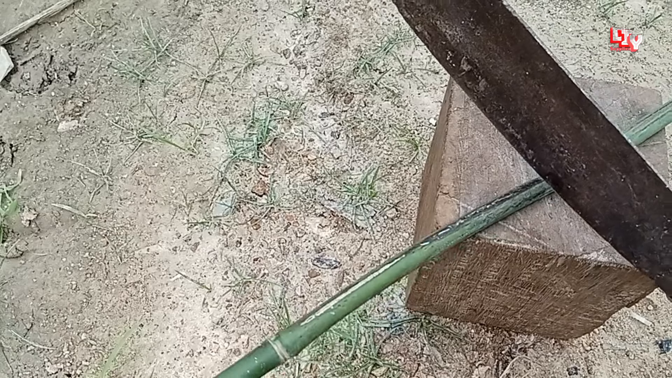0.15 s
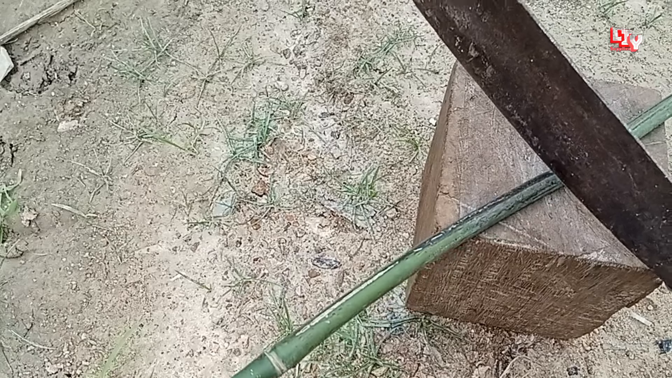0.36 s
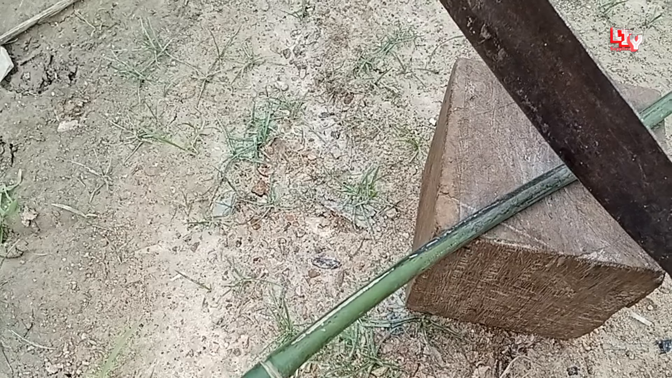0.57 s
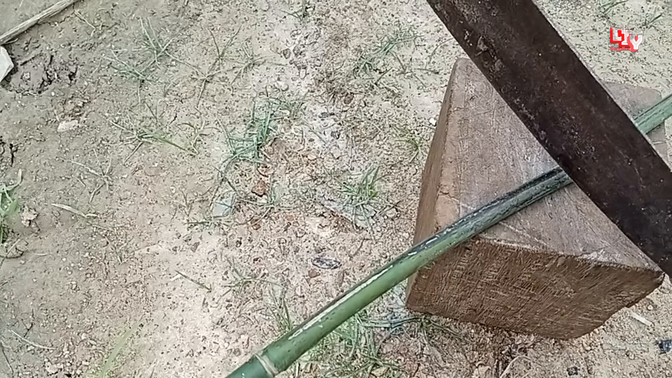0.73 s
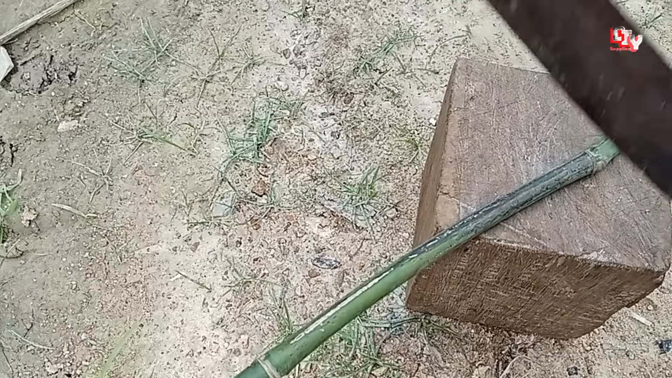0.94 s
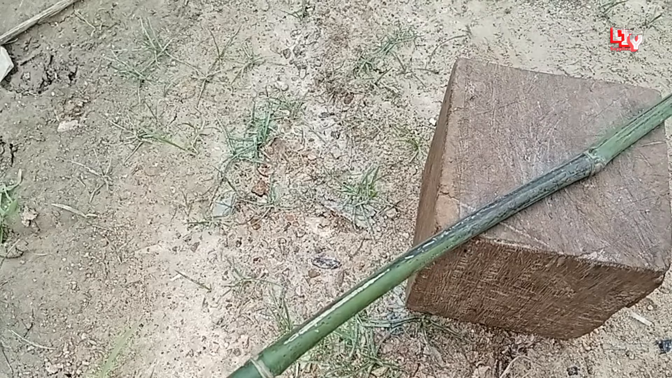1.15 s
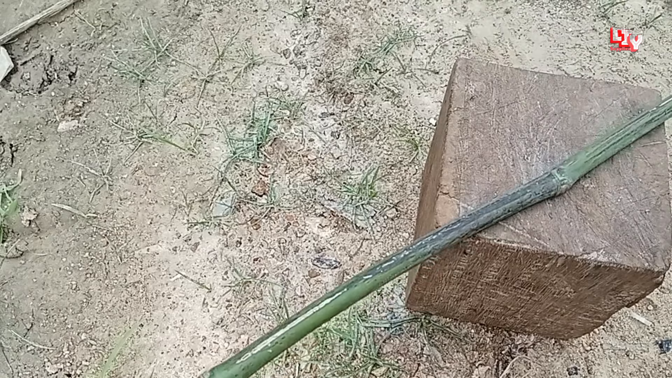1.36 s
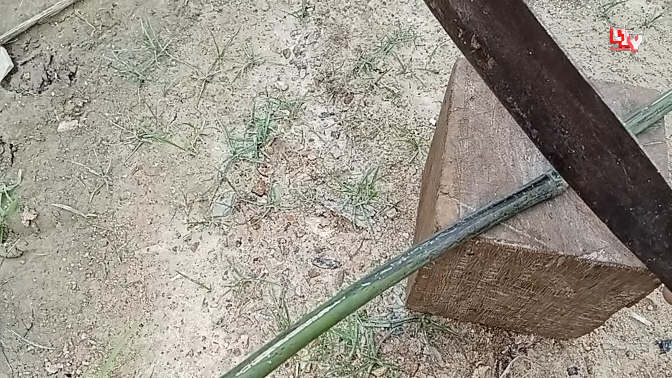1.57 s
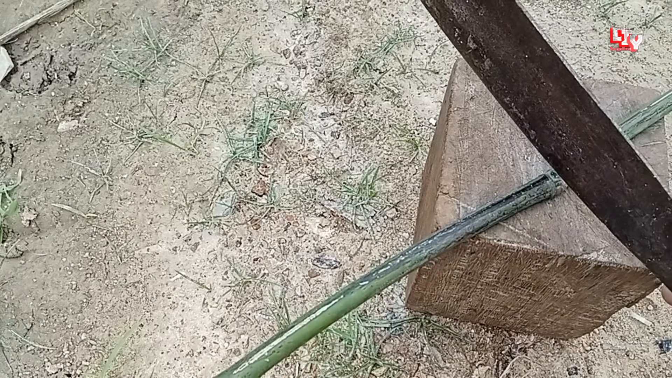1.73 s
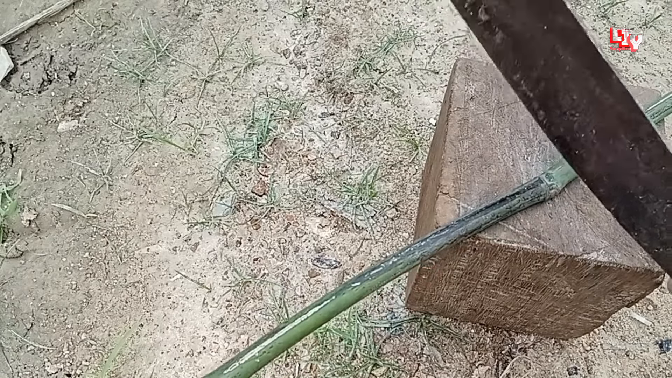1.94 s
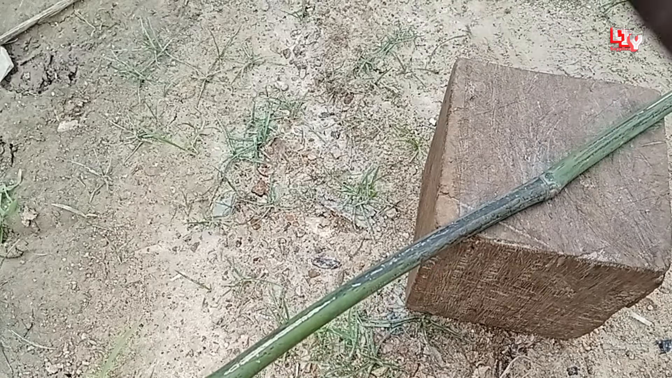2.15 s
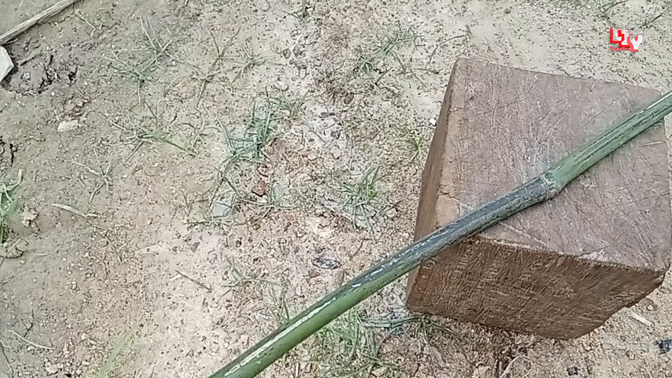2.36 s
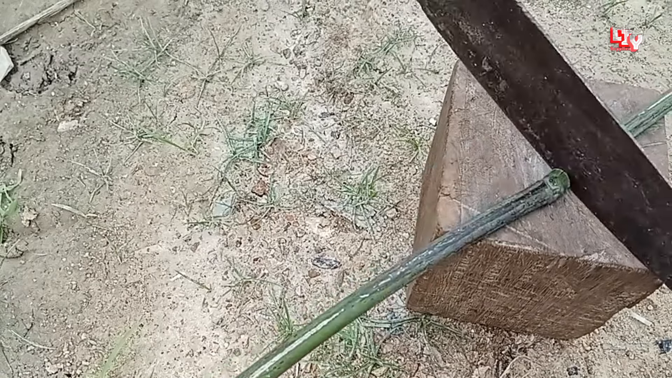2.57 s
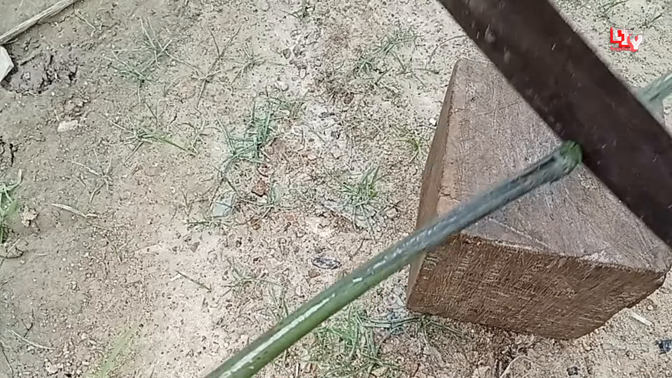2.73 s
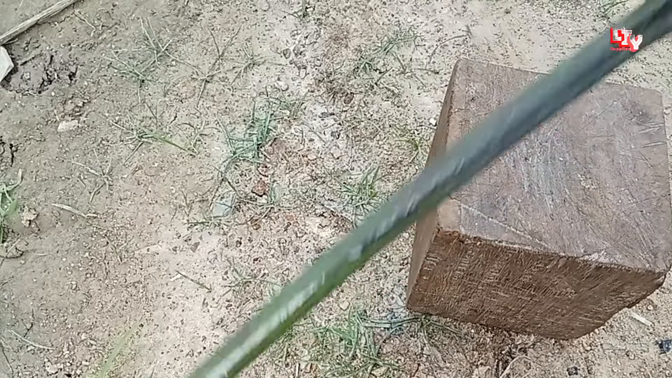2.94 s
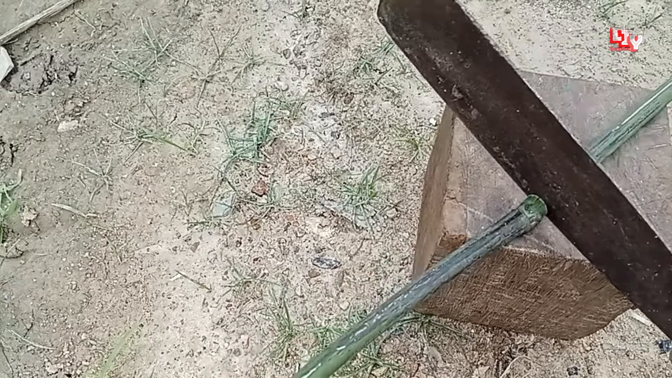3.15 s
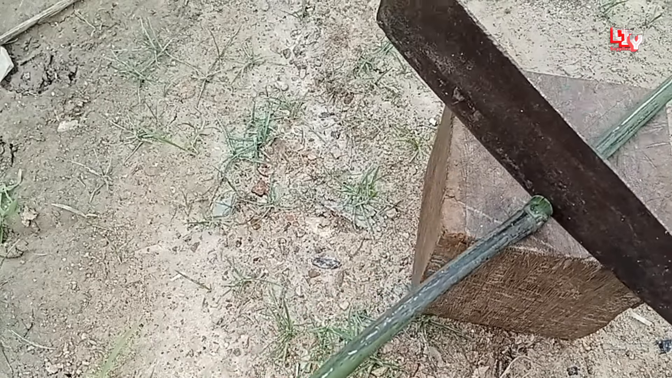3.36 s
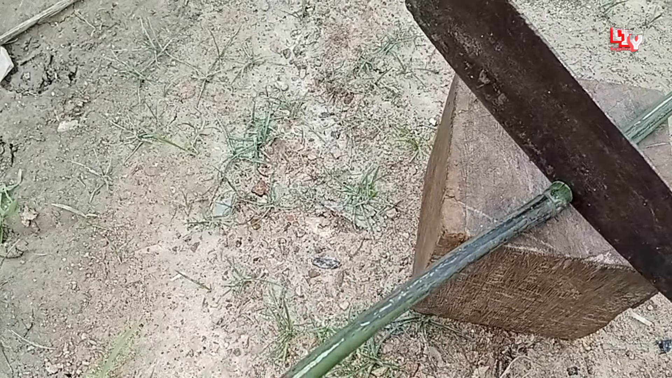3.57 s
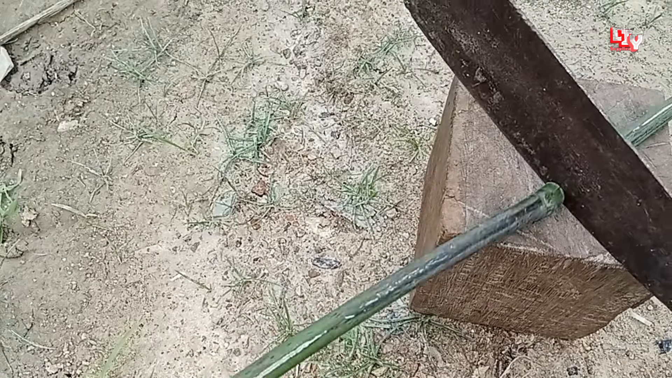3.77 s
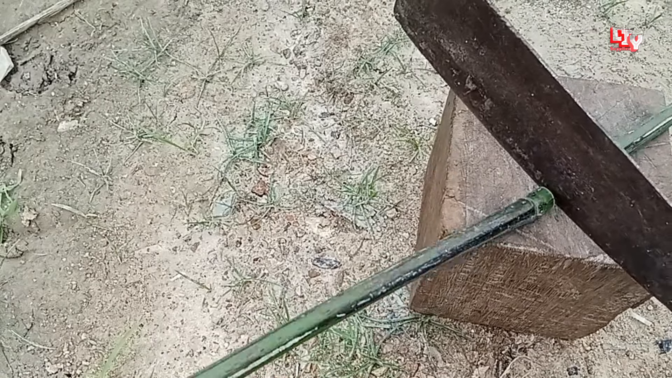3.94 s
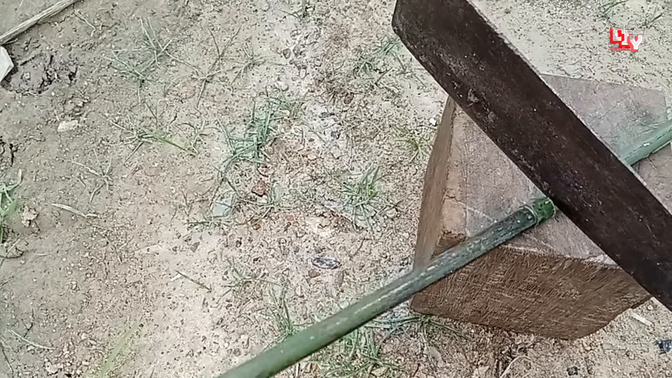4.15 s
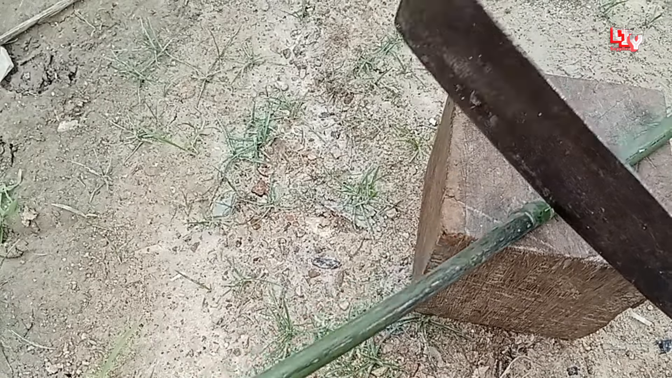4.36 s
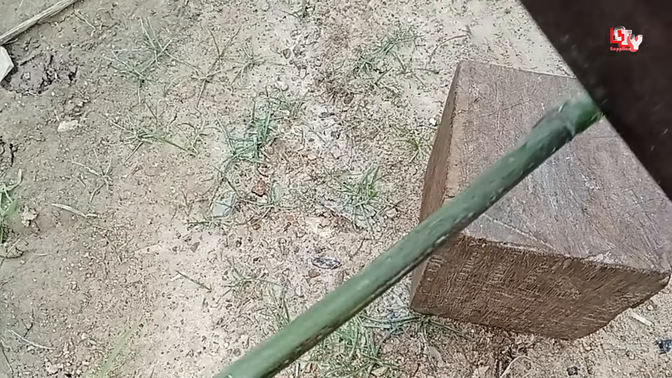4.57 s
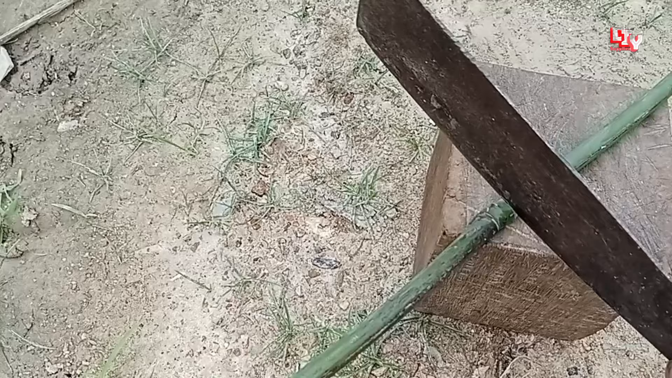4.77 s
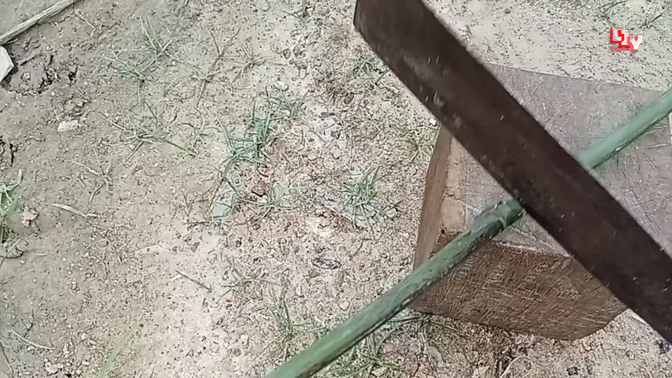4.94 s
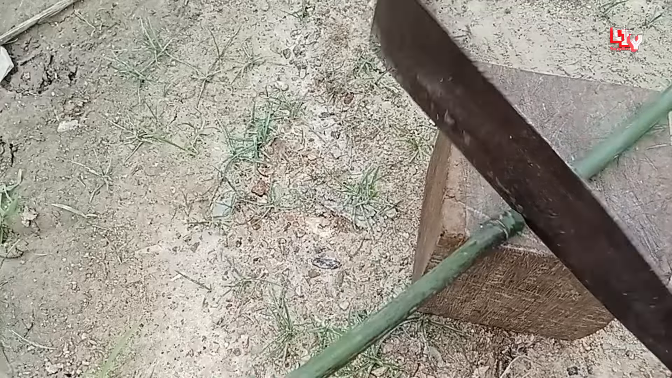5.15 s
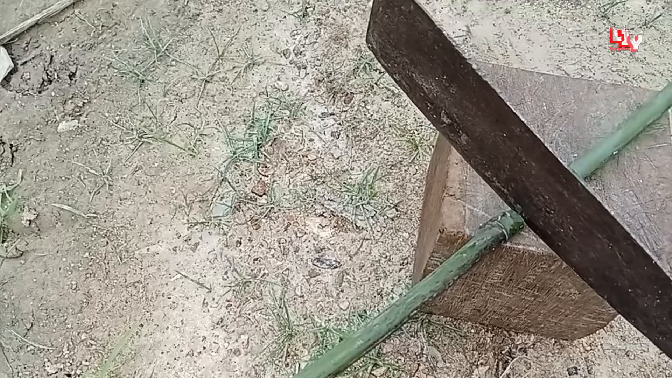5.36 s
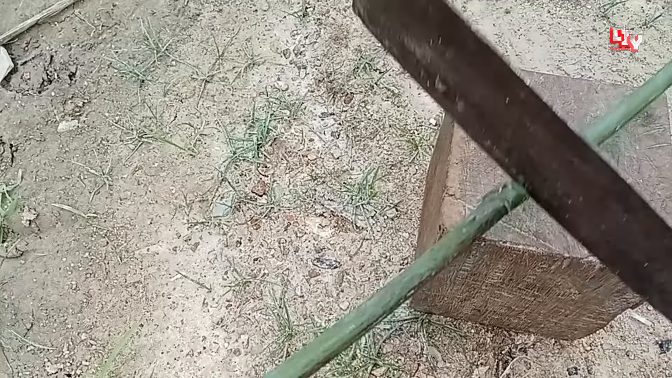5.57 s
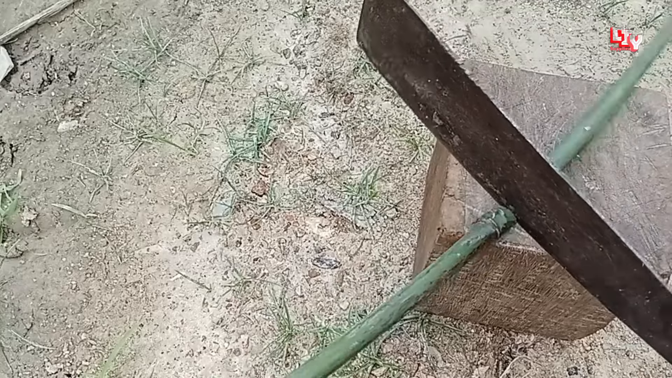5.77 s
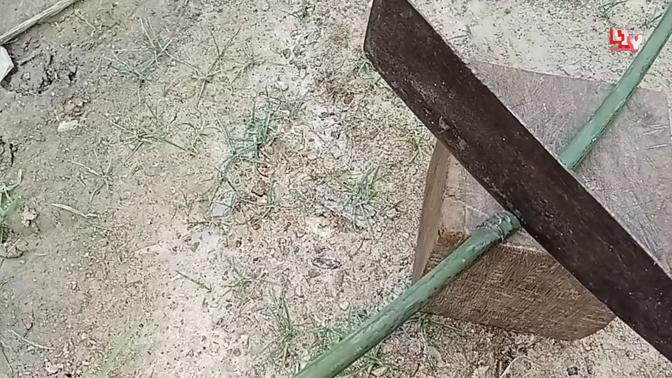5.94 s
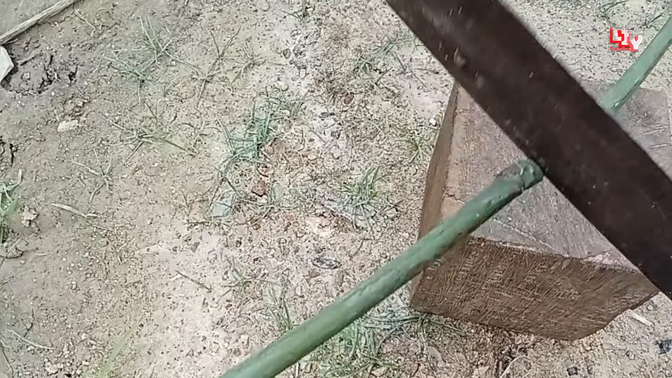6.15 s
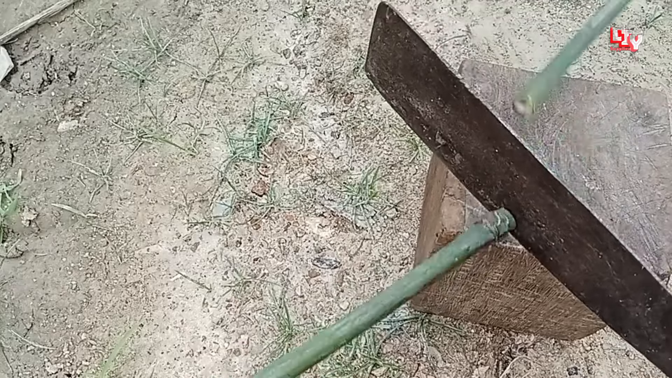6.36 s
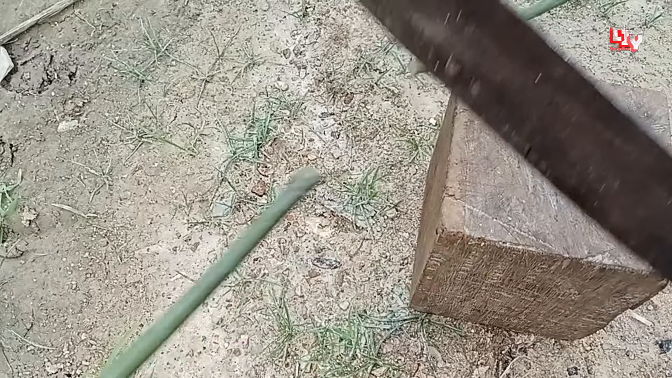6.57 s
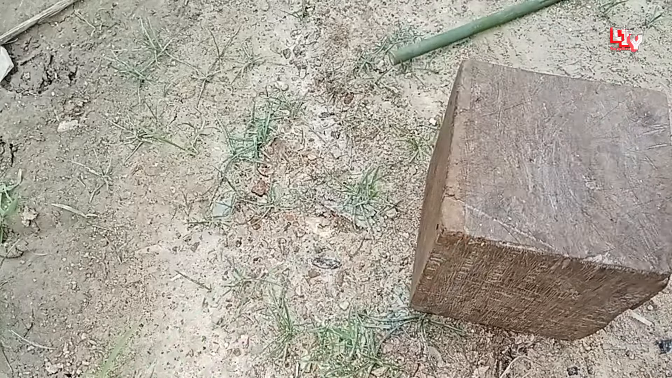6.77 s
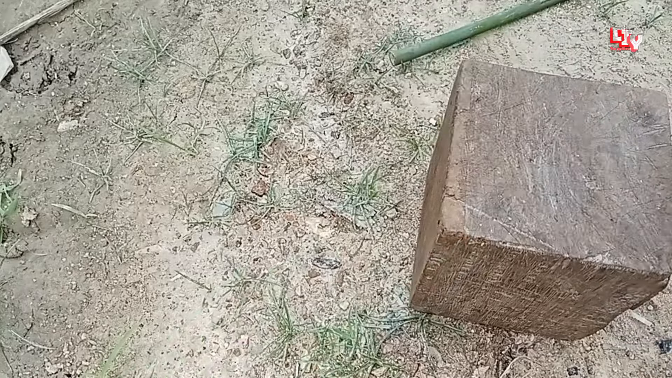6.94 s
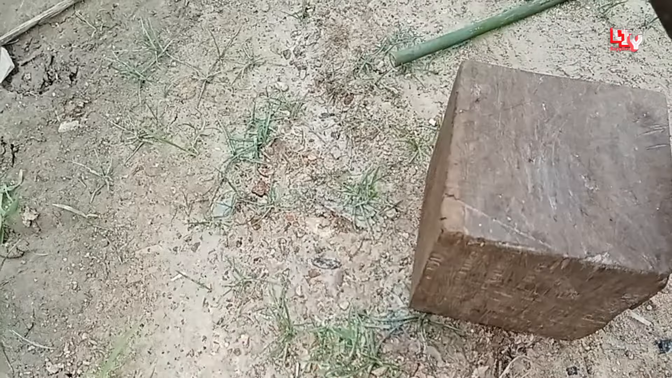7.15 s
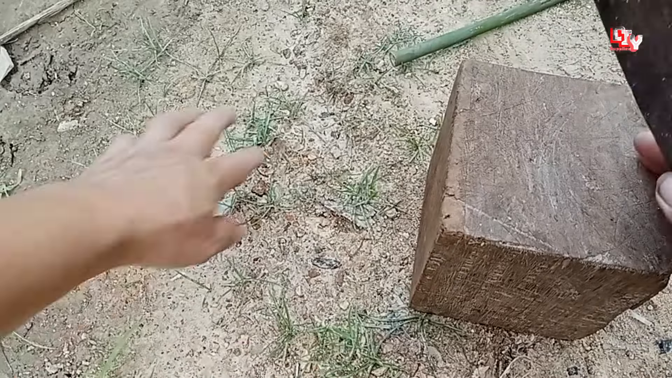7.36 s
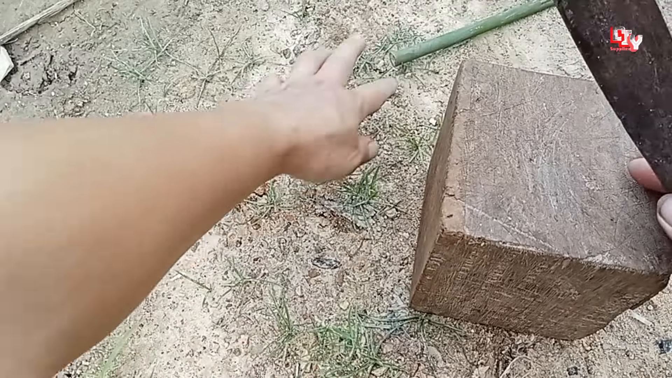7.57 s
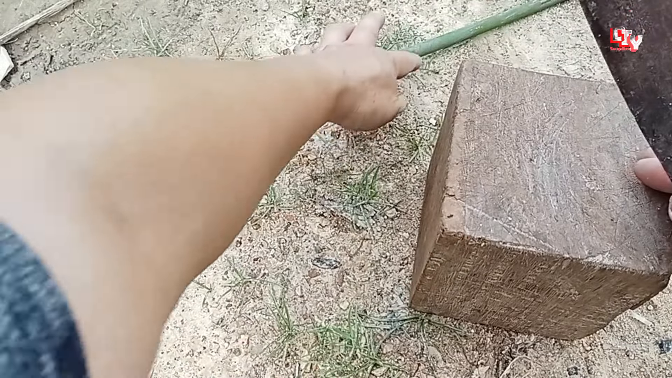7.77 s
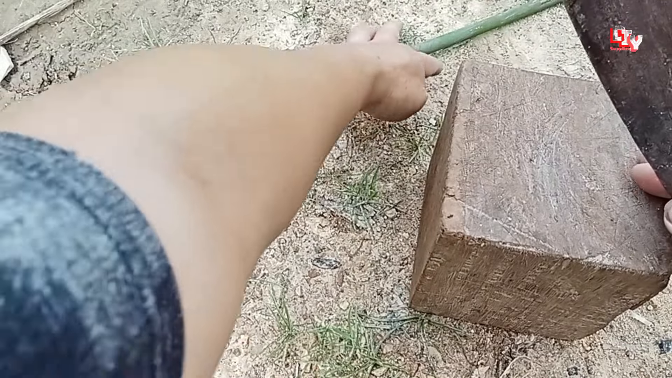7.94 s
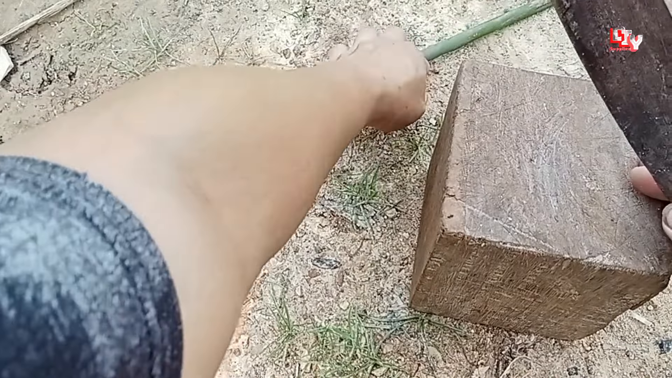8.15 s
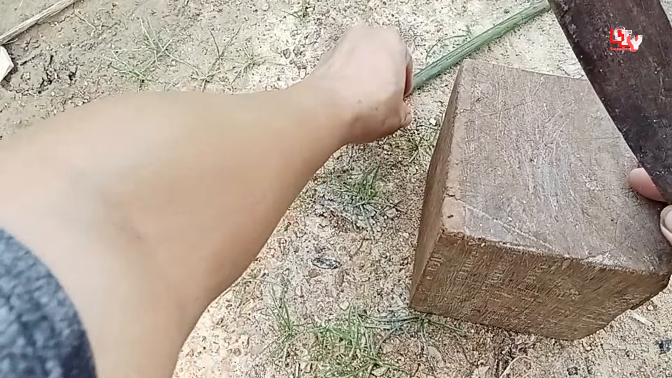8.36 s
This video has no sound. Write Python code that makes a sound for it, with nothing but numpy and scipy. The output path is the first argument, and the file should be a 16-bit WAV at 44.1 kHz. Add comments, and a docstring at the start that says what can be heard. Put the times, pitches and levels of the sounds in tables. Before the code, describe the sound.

Very close outdoor pickup with little echo: light hollow bamboo knocks first, then two loud, bright chops with wooden thuds and short stem ringing. The branch rasps and chatters on the block while fibres tick. Four more quick, dry blows come about half a second apart, slightly softer, and the severed piece tumbles with hollow clacks on the soil. It settles to hiss, low rumble, small ticks and a soft rustle.

```python
"""Outdoors, a green bamboo branch knocks lightly and is dragged; then a machete chops it on a wooden block.
Each blow is a burst of cracking fibres, a block thud and the fading tones of the hollow stem.
Between blows the branch scrapes (uneven noise), splinters and rattles on the block.
At the end the cut piece hums, bounces on dry ground with its own tones, and a hand reaches in as a soft swish.
Hiss and rumble run throughout, and the close microphone's input overloads on the hardest blows."""
import sys
import numpy as np
from scipy import signal
from scipy.fft import rfft, irfft, next_fast_len
from scipy.io import wavfile
from scipy.ndimage import uniform_filter1d

SR = 44100
rng = np.random.default_rng(int(sys.argv[2]) if len(sys.argv) > 2 else 0)


def output_pcm(signal):
    """Save a mono or channel-first signal as 16-bit PCM at the path in sys.argv[1].

    Samples are clipped to [-1, 1] before scaling.
    """
    pcm = np.clip(np.atleast_2d(signal).T, -1, 1) * 32767
    wavfile.write(sys.argv[1], SR, np.round(pcm).astype(np.int16))


N = 370864
TIME = np.arange(N) / SR  # seconds through the scene
HIT_S, ATTACK_S = 0.4, 0.005  # length of one hit; its opening part, which sets its level
AGE = np.arange(int(HIT_S * SR)) / SR  # seconds since a hit began

# The blade breaks on through and the stem slaps the block:
# start_s, force_db, knock_db and thud_db (both against the force)
FOLLOW_THROUGHS = [(3.049, -18, -15, -8.5), (3.0599, -21.5, -3.5, -17), (4.7082, -15, -12, -19),
                   (4.722, -29, 2.5, -10.5), (5.2002, -11.5, -10.5, -15.5), (5.215, -20.5, -12.5, -17.5),
                   (5.8159, -20, -10, -25.5), (6.2738, -18, -7, -9.5), (6.278, -13.5, 3, -5)]
# The branch scrapes over block and soil: start_s, length_s, rasp_db, sand_db (against the rasp)
SCRAPES = [(2.63, .11, -66, -1.5), (3.017, 0.18, -59, -3), (3.306, 0.31, -57.5, -5.5),
           (3.696, 0.057, -49.5, -2.5), (3.997, .14, -65, -3), (4.202, 0.2, -56.5, -2.5),
           (4.457, 0.15, -62, -5.5), (5.291, .02, -58.5, -1), (5.385, 0.0098, -64.5, -3.5),
           (5.466, .05, -59, 0.5), (6.759, .16, -66, -6), (7.09, .02, -64, 5), (7.2, 0.037, -65, 0),
           (8.201, 0.2, -70, 1)]
# Tones of the hollow stem at the first chops, also used for taps:
# pitch_hz, level_db (relative), t60_s (time to fade by 60 dB)
STEM_MODES = [(377, -15, 0.19), (974, -2, 0.094), (1140, -10.5, 0.088), (1530, -4, 0.13),
              (1776, -9.5, 0.31), (2010, -21, .25), (2236, 0.5, 0.11), (2690, 3, 0.12), (2980, -4, 0.11),
              (3380, -11.5, .08), (3350, -10, .12), (3870, -8, .13), (3780, -8.5, 0.11), (4730, -17, .1),
              (9825, -19, .12)]
# Tone colour of a dull knock: frequency_hz, level_db (relative)
KNOCK_COLOUR = [(200, -28), (420, -2), (600, -9.5), (800, -5), (1020, -1), (1400, -5), (1800, -12),
                (3000, -45.5)]
# Tone colour of bright snaps, also used for sand: frequency_hz, level_db (relative)
SNAP_COLOUR = [(3000, -34), (5500, -5), (7000, -9.5), (8500, -2), (9800, 5), (11000, -7), (13000, -6.5),
               (15000, -8), (16500, -20)]


def undb(db):
    """Turn decibels into a gain."""
    return 10 ** (np.asarray(db) / 20)


def unit(x):
    """Scale to an rms (average strength) of 1."""
    return x / np.sqrt(np.mean(x ** 2))


def attack_level(x, db):
    """Scale a hit so that its first milliseconds have this rms level."""
    attack = x[:int(ATTACK_S * SR)]
    return x * undb(db) / np.sqrt(np.mean(attack ** 2))


def fade(t60):
    """Die away smoothly, by 60 dB in t60 seconds."""
    return np.exp(-np.log(1000) * AGE / max(t60, 1 / SR))


def onset(rise_s):
    """Build up smoothly from silence at the start of a hit."""
    return 1 - np.exp(-AGE / rise_s)


def sine(hz):
    """A steady tone over the length of a hit."""
    return np.sin(2 * np.pi * hz * AGE)


def add(out, s, x):
    """Mix x into out from time s."""
    start = int(s * SR)
    out[start:start + len(x)] += x[:len(out) - start]


def colour(x, points):
    """Filter through (Hz, dB) points without any sound ahead of the input."""
    size = 2 * next_fast_len(len(x) // 2 + 2048)
    hz, db = np.transpose(points)
    freqs = np.maximum(np.arange(size // 2 + 1) * SR / size, 1)
    gain = undb(np.interp(np.log(freqs), np.log(hz), db))
    # Folding the cepstrum forward in time gives a minimum-phase filter
    cepstrum = irfft(np.log(gain))
    cepstrum[1:size // 2] *= 2
    cepstrum[size // 2 + 1:] = 0
    return irfft(rfft(x, size) * np.exp(rfft(cepstrum)))[:len(x)]


def ring(modes, scatter_db=1.0, detune=0.005):
    """Fading tones; each strike meets them at another spot, so levels and pitches vary a little."""
    chance = rng.standard_normal((len(modes), 2))
    total = np.zeros(len(AGE))
    for k, ((hz, db, t60), (level_chance, pitch_chance)) in enumerate(zip(modes, chance)):
        gain = (-1) ** k * undb(db + scatter_db * level_chance)
        total += gain * fade(t60) * sine(hz * (1 + detune * pitch_chance))
    return total


def walk(rate):
    """Slow random wander, about rate new values a second, with a spread near 1."""
    hold = int(SR / rate)
    steps = np.repeat(rng.standard_normal(N // hold + 1), hold)
    return unit(uniform_filter1d(uniform_filter1d(steps, hold), hold)[:N])


def chops():
    """Each chop bites, and all but the first break on through; once the blade rings free."""
    # Blade bites into the stem: start_s, force_db, knock_db and thud_db (against the force),
    # wall_hz, block_hz (pitches), ring_db (stem)
    bites = [(2.4592, -7.5, -12.5, -4, 2080, 174.9, -24.5), (3.0426, -8, -7, -7.5, 2186, 190, -30.5),
             (4.7005, -10, -8.5, -10.5, 2940, 350, -38.5), (5.188, -12, -10, -8, 2940, 280, -41),
             (5.7867, -9, -8, -11, 2950, 330, -37.5), (6.269, -14, -16.5, -20, 2510, 400, -46)]
    # Tones of the blade: pitch_hz, level_db (relative), t60_s
    blade_modes = [(2990, 0, .25), (5313, -18, .1)]
    split_wall_hz, follow_ring_db = 2450, -36  # pitch of the opened wall; ring of the stem
    edge_grip_t60_s = 0.3  # the embedded edge damps the stem

    out = np.zeros(N)
    for s, force_db, knock_db, thud_db, wall_hz, block_hz, ring_db in bites:
        stroke = blow(force_db, knock_db, thud_db, wall_hz, block_hz, snap_db=-9, bark_db=-5.5, t60=0.019)
        add(out, s, stroke + stem_ring(s, ring_db))
    for s, force_db, knock_db, thud_db in FOLLOW_THROUGHS:
        # The latest bite tells which spot of the block is struck
        block_hz = [hz for start, *_, hz, _ in bites if start < s][-1]
        stroke = blow(force_db, knock_db, thud_db, split_wall_hz, block_hz, snap_db=-11, bark_db=-7, t60=0.022)
        add(out, s, stroke + stem_ring(s, follow_ring_db) * fade(edge_grip_t60_s))
    add(out, 4.7005, attack_level(ring(blade_modes, detune=0.001), -37))  # the blade springs free of the cut
    return out


def blow(force_db, knock_db, thud_db, wall_hz, block_hz, snap_db, bark_db, t60):
    """One stroke of the edge: the wall cracks and barks at its own pitch, fibres snap, the block thuds."""
    bark = fade(1.1 * t60) * onset(0.0014) * sine(wall_hz)
    wall = crack(0, t60, bite_s=0.001) + attack_level(bark, bark_db) + snap(snap_db, 0.98 * t60, bite_s=0.00092)
    knock = fracture(KNOCK_COLOUR, knock_db, 0.86 * t60, bite_s=0.00055)
    body = knock + attack_level(thud(block_hz), thud_db)
    return undb(force_db) * (wall + body)


def crack(db, t60, bite_s):
    """Breaking fibres and the wall tones that they kick."""
    # Tone colour of the breaking: frequency_hz, level_db (relative)
    crack_colour = [(900, -41.5), (1600, -8.5), (2200, 1), (2900, -2.5), (3600, -3.5), (4300, -7),
                    (5300, -14), (7000, -26.5), (12000, -51.5)]
    # Stiff, quickly damped tones of the wall under the edge: pitch_hz, level_db (relative),
    # t60_s (before the further fade below)
    wall_modes = [(1760, -10.5, 0.12), (2204, 0.5, 0.031), (2343, -4.5, .04), (2700, -6, 0.037),
                  (2970, -1.5, 0.047), (3260, 0.5, .04), (3610, -1, 0.02), (4130, -9, 0.054),
                  (5070, -11, 0.042), (5030, -17.5, 0.011)]
    kick = ring(wall_modes, scatter_db=4.5, detune=0.016) * fade(4 * t60) * onset(bite_s)
    return fracture(crack_colour, db - 3.5, t60, bite_s) + attack_level(kick, db - 6)


def snap(db, t60, bite_s):
    """The bright edge of a break; short splinters zing at high pitches."""
    # Tones of short fibres: pitch_hz, level_db (relative), t60_s (before the further fade below)
    fibre_modes = [(6890, -7, .025), (8600, -7.5, 0.023), (9400, -5.5, 0.011), (9360, 4.5, 0.027),
                   (10800, -3.5, 0.023), (10660, 0, 0.042), (11500, -6.5, 0.02), (12000, -10, .02),
                   (15400, -6.5, 0.022)]
    zing = ring(fibre_modes, scatter_db=6.0, detune=0.013) * fade(3 * t60)
    return fracture(SNAP_COLOUR, db - 1, t60, bite_s) + attack_level(zing, db - 5.0)


def fracture(points, db, t60, bite_s=0.001):
    """A noise burst of breaking fibres: it builds while the edge bites, then dies away."""
    burst = rng.standard_normal(len(AGE)) * fade(t60) * onset(bite_s)
    return attack_level(colour(burst, points), db)


def thud(hz, t60=0.014):
    """A heavy body gives a few quickly damped swings, with a weaker overtone."""
    # The block radiates little deep bass: frequency_hz, level_db (relative)
    block_colour = [(30, -34.5), (60, -15), (110, -2.5), (500, 4), (1200, -11.5), (3000, -36.5)]
    swing = sine(hz) + undb(-12.0) * sine(2.4 * hz)
    return colour(fade(t60) * swing, block_colour)


def stem_ring(s, db):
    """The stem rings on, with the tones of the spot struck at time s."""
    # Tones of the stem where the later chops strike: pitch_hz, level_db (relative), t60_s
    later_spot_modes = [(376, -16, .19), (700, -6, 0.15), (984, -0.5, 0.11), (1520, -1.5, 0.16),
                        (1740, -9, 0.098), (2099, -2.5, .078), (2400, 0, .05), (3020, -0.5, .06),
                        (3370, -9.5, .065), (3880, -6, .06), (4640, -19, .09), (9500, -18.5, .1)]
    later_spot_s = 4.5  # from here on the chops strike the later spot
    modes = STEM_MODES if s < later_spot_s else later_spot_modes
    return attack_level(ring(modes, scatter_db=2.5, detune=0.0051), db)


def taps():
    """The branch knocks on blade or block and touches again once, more weakly."""
    # Light knocks: start_s, strength_db, hardness_db, ring_db (against the strength)
    knocks = [(0.393, -42.5, 1, -9.5), (.667, -37, 1, -10), (1.6043, -33.5, 0.5, -12.5),
              (2.566, -51.5, 2, -4.5), (3.1, -34.5, 4.5, -14), (3.2261, -44.5, -4.5, -3.5),
              (3.8198, -28.5, 5.5, -7), (3.827, -27.5, 5.5, -20), (3.846, -33.5, 1.5, -1.5),
              (4.2742, -43.5, -0.5, -10), (5.348, -54.5, 4, -8), (7.0723, -39.5, 3, -12),
              (8.316, -46.5, 7, -24)]
    rebound_s, rebound_db = 0.0095, -9.5  # delay and strength of the second touch
    out = np.zeros(N)
    for s, db, hardness_db, ring_db in knocks:
        add(out, s, tap(db, hardness_db, ring_db))
        add(out, s + rebound_s, tap(db + rebound_db, hardness_db, ring_db))
    return out


def tap(db, hardness_db, ring_db):
    """A light contact of the held branch, ringing with the hollow stem's tones."""
    return contact(db, hardness_db, ring_db, -18, STEM_MODES, t60=0.025, grip_t60=0.32)


def contact(db, hardness_db, ring_db, snap_db, modes, t60, grip_t60):
    """A light contact: the harder, the more click and the less body; the piece rings, damped by what holds it."""
    click = crack(-2.65, t60, bite_s=0.00014) + snap(snap_db, 1.1 * t60, bite_s=0.00034)
    knock = fracture(KNOCK_COLOUR, -2.06, 1.56 * t60, bite_s=0.00045)
    body = knock + attack_level(thud(237), -11)
    tone = attack_level(ring(modes, scatter_db=6, detune=0.012) * fade(grip_t60), ring_db)
    return undb(db) * (undb(hardness_db) * click + undb(-hardness_db) * body + tone)


def rattle(count):
    """The sprung branch chatters on the block at an even rate, swelling and dying."""
    start_s, gap_s, peak_s = 3.8848, 0.0201, 3.945
    peak_db, slope_db_per_s = -40, 107  # strength at the peak; drop away from it on both sides
    out = np.zeros(N)
    for s in start_s + gap_s * np.arange(count):
        db = peak_db - slope_db_per_s * abs(s - peak_s)
        add(out, s, tap(db, hardness_db=2, ring_db=-2.5))
    return out


def cut_piece():
    """The last break-through frees the piece and sets its air column humming; the piece also bounces."""
    # Bounces: start_s, strength_db, hardness_db, ring_db (against the strength)
    bounces = [(6.3438, -42.5, -9.5, 4.5), (6.4863, -39, 1.5, -11), (6.495, -35, 0, -5),
               (6.6059, -34.5, 1.5, 0), (6.62, -33.5, 2.5, -20), (6.6463, -38.5, 5.5, 0.5),
               (6.662, -46.5, 6, -18)]
    # Air column and wall of the piece: pitch_hz, level_db (relative), t60_s (before the contact's damping)
    piece_modes = [(385, 0, 0.2), (753, -5.5, 0.32), (960, -21, 0.057), (1210, -10, 0.33), (1683, -3, 0.21),
                   (1800, -2, 0.16), (2310, 10.5, 0.11), (2250, 0, 0.1), (2880, 10, 0.078),
                   (3106, -23, 0.083), (3400, 2, 0.1), (4400, -13, .07), (4996, -16, 0.14)]
    # Air column of the piece while it flies free: pitch_hz, level_db (relative), t60_s
    hum_modes = [(390, -4, .28), (760, 2.5, .33), (1222, -11.5, 0.23), (1663, -3, 0.24)]
    gritty_snap_db = -5.5  # gritty soil gives a brighter edge than a tap

    out = np.zeros(N)
    for s, db, hardness_db, ring_db in bounces:
        add(out, s, contact(db, hardness_db, ring_db, gritty_snap_db, piece_modes, t60=0.016, grip_t60=1.8))
    landing = np.clip((0.3 - AGE) / 0.078, 0, 1)  # the ground stops the hum
    hum = ring(hum_modes, scatter_db=6.0) * landing
    add(out, FOLLOW_THROUGHS[-1][0], attack_level(hum, -35.5))
    return out


def splinters():
    """Splinters break at set times, and small ones at random times during the scrapes."""
    # Splinters, from faint ticks to loud snaps, at set times: start_s, strength_db, brightness_db
    placed_splinters = [(.113, -64.5, -4.5), (.216, -63, 0), (3.341, -47, -6), (3.5916, -43, -3),
                        (3.6994, -43.5, -5), (3.719, -38, -2.5), (3.759, -40.5, 6), (3.781, -37, 2),
                        (3.811, -42, 3), (3.82, -32.5, 9), (4.051, -48, -3), (4.0605, -45.5, 1),
                        (4.3146, -53, 6), (4.416, -48.5, -1.5), (4.474, -49, -4), (4.6676, -51, -3),
                        (5.46, -47, -2), (5.5847, -58, -4), (5.932, -63, 0.5), (6.1667, -51.5, -3.5),
                        (6.7149, -58.5, 6), (6.7643, -56, 4), (7.03, -54, -2.5), (7.072, -46.5, 2.5),
                        (7.1004, -53.5, 4)]
    small_per_s, over_drag_db, spread_db = 7.3, 6, 3.5  # rate, strength over the rasp, spread either way
    out = np.zeros(N)
    for s, db, brightness_db in placed_splinters:
        add(out, s, splinter(db, brightness_db))
    for start, length, rasp_db, _ in SCRAPES:
        for place, size, thinness in rng.random((round(small_per_s * length), 3)):
            db = rasp_db + over_drag_db + spread_db * (2 * size - 1)
            add(out, start + place * length, splinter(db, 7 * thinness - 5))
    return out


def splinter(db, brightness_db):
    """One fibre snaps without ringing the stem; thin ones are brighter."""
    dull = crack(db - brightness_db, 0.024, bite_s=0.0004)
    bright = snap(db + brightness_db, 0.012, bite_s=0.00036)
    return dull + bright


def dragging():
    """The branch scrapes in uneven slips; the moving contact rasps now one wall resonance, now another."""
    # Bands in which the rubbed wall rasps: centre_hz, width_hz (roughly, after both filter passes),
    # level_db (relative, middle of its wander)
    rasp_bands = [(1510, 410, -5.5), (2230, 290, 0), (2470, 630, -0.5), (3175, 830, -0.5),
                  (3670, 660, -5.5), (4500, 360, -6.5), (5900, 2400, -14)]
    slips = grit(rate=230, spread_db=5.5, smooth=0.6)
    rub = np.zeros(N)
    for hz, width, db in rasp_bands:
        source = 0.83 * slips + grit(rate=130, spread_db=4.5, smooth=0.36)
        rub += undb(db + 1.7 * walk(30)) * band(source, hz, width)
    rub = unit(rub)
    sand = unit(colour(slips + grit(rate=400, spread_db=8.5, smooth=0.8), SNAP_COLOUR))
    out = np.zeros(N)
    for start, length, rasp_db, sand_db in SCRAPES:
        out += undb(rasp_db) * scrape_shape(start, length) * (rub + undb(sand_db) * sand)
    return out


def grit(rate, spread_db, smooth):
    """Tiny slips of uneven size, each a few milliseconds long, over a smooth rub; rate is slips a second."""
    size_db = spread_db * np.minimum(rng.exponential(size=N), 3.5)
    slips = (rng.random(N) < rate / SR) * undb(size_db)
    # Each slip's pressure fades with a time constant of 2.2 ms
    pressure = signal.lfilter([1], [1, -np.exp(-1 / (0.0022 * SR))], slips)
    return unit((unit(pressure) + smooth) * rng.standard_normal(N))


def band(x, hz, width):
    """One resonance, applied twice for steep sides."""
    b, a = signal.iirpeak(hz, hz / (1.5 * width), fs=SR)  # wider, as the second pass narrows it
    once = signal.lfilter(b, a, x)
    return unit(signal.lfilter(b, a, once))


def scrape_shape(start, length):
    """A scrape takes hold, stays and lets go."""
    attack_s, release_s = 0.017, 0.03  # time constants
    before = np.minimum(TIME - start, 0)
    after = np.maximum(TIME - start - length, 0)
    return np.exp(before / attack_s - after / release_s)


def handling():
    """Hand, arm and blade slide softly past as swelling noise; the branch bumps dully as a short low tone."""
    # Soft swishes: middle_s, half_length_s, level_db (middle of its wander)
    swishes = [(1.227, 0.12, -65.5), (2.443, 0.041, -58), (6.78, 0.12, -61), (7.454, 0.33, -65.5),
               (8.388, 0.04, -48.5)]
    # Tone colour of a swish: frequency_hz, level_db (relative)
    swish_colour = [(300, 3), (700, -1.5), (1300, -1), (1800, 0.5), (3200, -1.5), (5000, -19.5),
                    (10000, -14), (16000, -37)]
    # Dull bumps as the branch is shifted: start_s, level_db, pitch_hz
    bumps = [(3.352, -32, 145), (3.505, -40, 126), (4.9, -40, 190)]
    swell = sum(undb(db) * np.exp(-((TIME - s) / half) ** 2) for s, half, db in swishes)
    out = swell * undb(walk(23)) * unit(colour(rng.standard_normal(N), swish_colour))
    for s, db, hz in bumps:
        add(out, s, attack_level(fade(0.045) * sine(hz), db))
    return out


def yard(x, near_db, near_t60, far_db, far_t60):
    """Quick scatter from the ground and nearby things, and a faint later wash, made from fading noise."""
    # Tone colour of the reflections: frequency_hz, level_db (relative)
    yard_colour = [(100, -2.5), (400, -3), (1200, 2), (3000, 1), (6000, -2.5), (10000, 1), (16000, 0)]
    noise = colour(rng.standard_normal(len(AGE)), yard_colour) * (1 - np.exp(-(AGE / 0.006) ** 2))
    near, far = noise * fade(near_t60), noise * fade(far_t60)
    response = undb(near_db) * near / np.linalg.norm(near) + undb(far_db) * far / np.linalg.norm(far)
    return x + signal.fftconvolve(x, response)[:N]


def background():
    """Outdoor hiss, wavering slightly, with faint whines, and a low, wavering rumble."""
    # Tone colour of the hiss: frequency_hz, level_db (relative)
    air_colour = [(120, -22.5), (200, -3), (300, -0.5), (520, -7), (790, -14.5), (1200, -15), (2000, -20.5),
                  (3100, -20), (4100, -31), (6500, -40), (8300, -36), (9800, -28), (11000, -44),
                  (16000, -47.5)]
    # Thin, faint whines in the hiss: pitch_hz
    whine_pitches = [4750, 5570, 6390, 9900]
    # Tone colour of the rumble: frequency_hz, level_db (relative)
    rumble_colour = [(20, -26.5), (45, -18), (70, -6), (105, 1.5), (160, -4.5), (250, -18.5), (500, -30.5),
                     (1000, -53.5)]
    # Course of the rumble: time_s, level_db (before the 3 dB lift and the waver below)
    rumble_course = [(0.0, -56.5), (1.47, -54.5), (2.06, -59.5), (2.53, -54.5), (3.35, -55), (3.51, -49.5),
                     (4.07, -54), (4.97, -49), (5.48, -53.5), (6.47, -52.5), (7.0, -56.5), (8.41, -54.5)]

    air_db = -62.5 + 0.7 * walk(3.7)
    air = unit(colour(rng.standard_normal(N), air_colour)) * undb(air_db)
    whine = sum(walk(500) * np.sin(2 * np.pi * hz * TIME) for hz in whine_pitches)
    rumble_db = 3 + np.interp(TIME, *np.transpose(rumble_course)) + 1.7 * walk(7.7)
    rumble = undb(rumble_db) * unit(colour(rng.standard_normal(N), rumble_colour))
    return air + undb(-81.5) * unit(whine) + rumble


def scene():
    """The hits echo in the open yard; the soft sounds are added without echo."""
    hits = chops() + taps() + rattle(count=5) + cut_piece() + splinters()
    soft = dragging() + handling() + background()
    echoing = yard(hits, near_db=-19.5, near_t60=0.085, far_db=-34.5, far_t60=0.33)
    return (echoing + soft)[None]


def record(dry):
    """The input flattens the hardest blows; the deepest bass and the top are cut."""
    top_hz = 15700
    clipped = dry / (1 + dry ** 8) ** (1 / 8)
    thinned = signal.sosfilt(signal.butter(2, 45, "high", fs=SR, output="sos"), clipped)
    return signal.sosfilt(signal.ellip(10, 0.2, 90, top_hz, fs=SR, output="sos"), thinned)


dry = scene()
out = record(dry)
output_pcm(out)
```